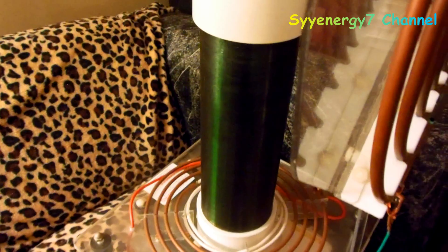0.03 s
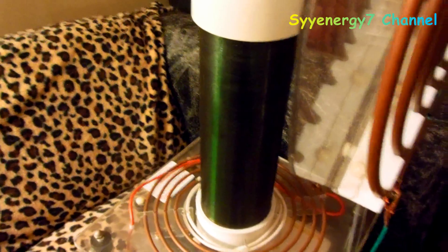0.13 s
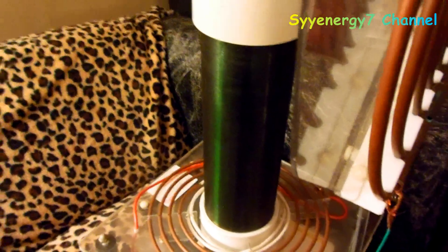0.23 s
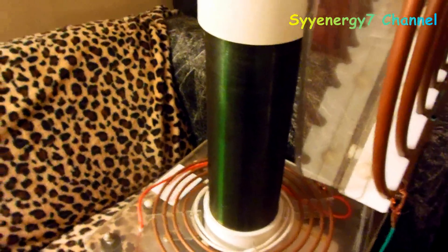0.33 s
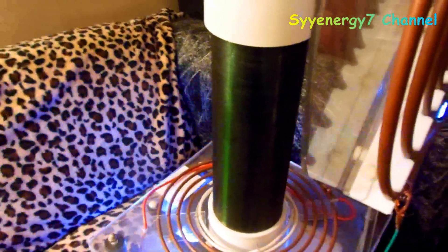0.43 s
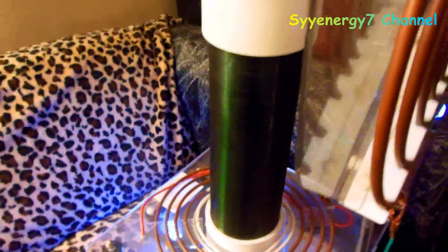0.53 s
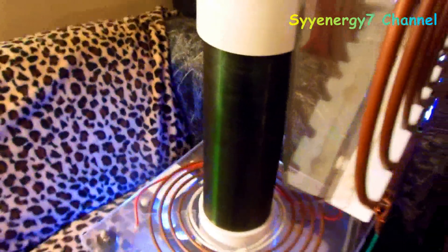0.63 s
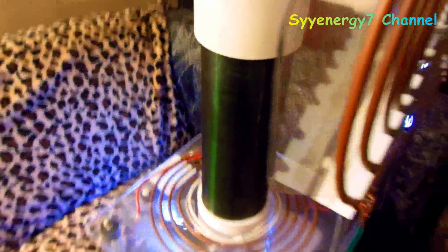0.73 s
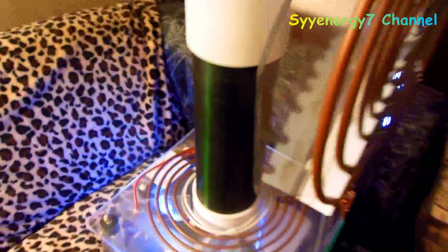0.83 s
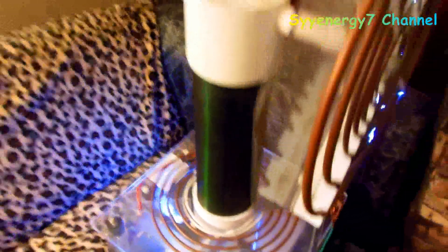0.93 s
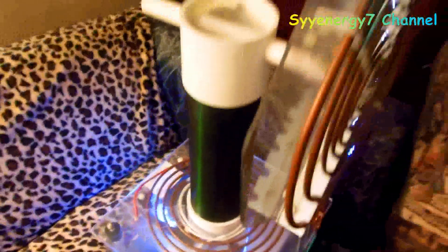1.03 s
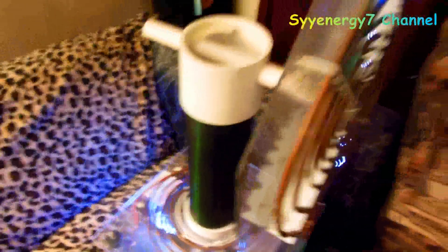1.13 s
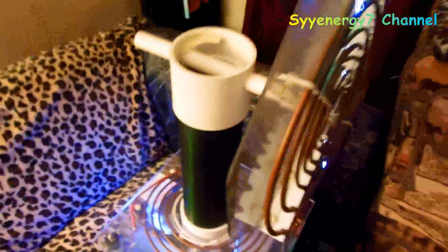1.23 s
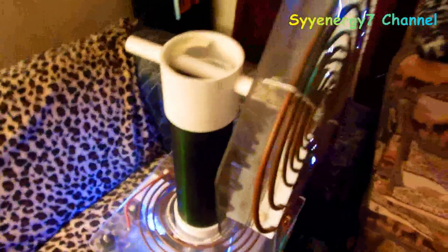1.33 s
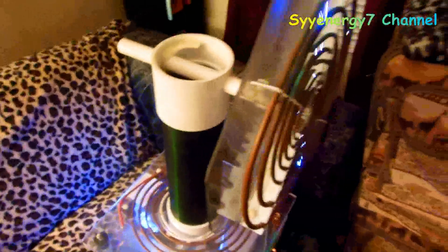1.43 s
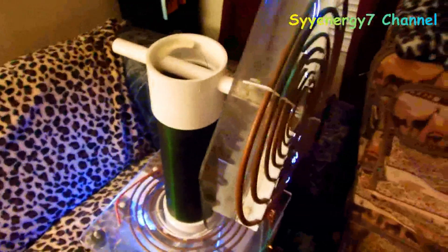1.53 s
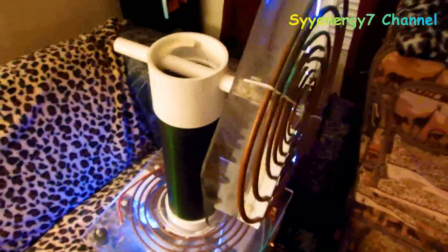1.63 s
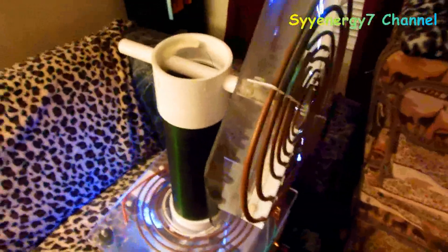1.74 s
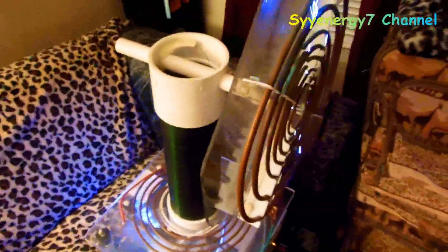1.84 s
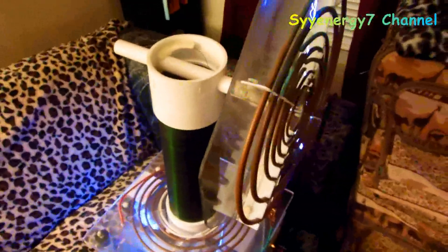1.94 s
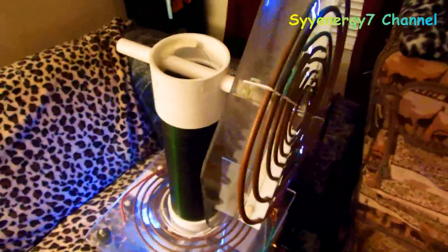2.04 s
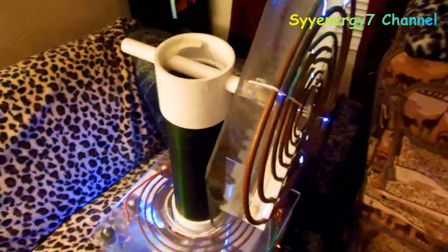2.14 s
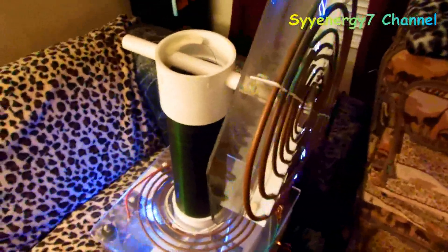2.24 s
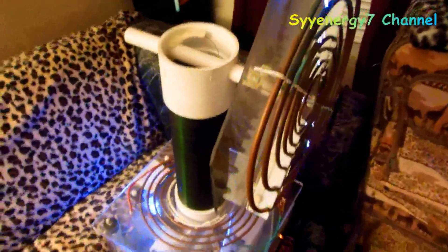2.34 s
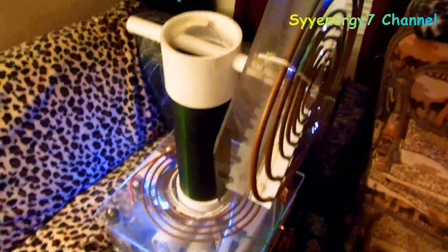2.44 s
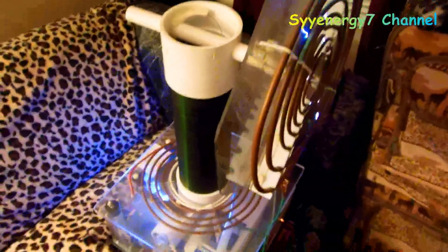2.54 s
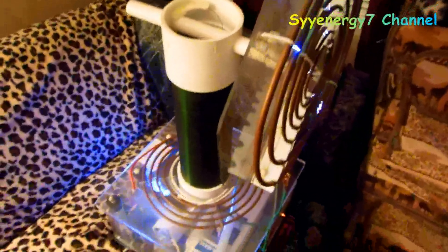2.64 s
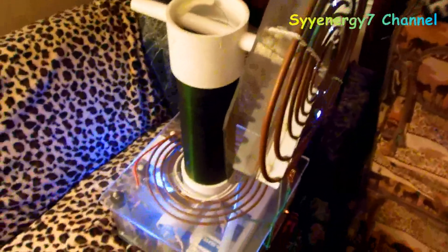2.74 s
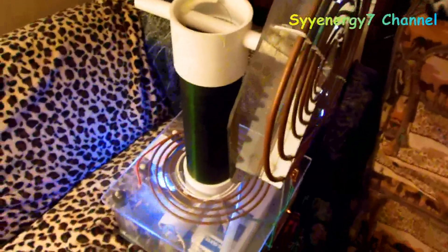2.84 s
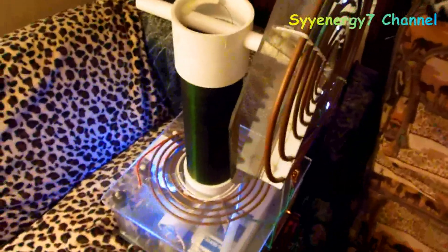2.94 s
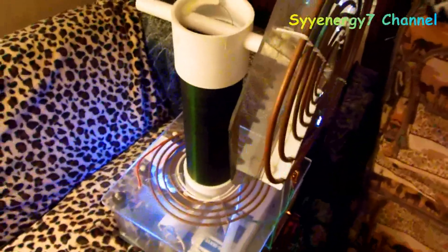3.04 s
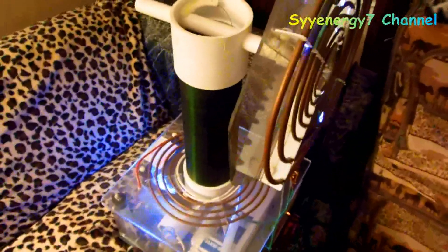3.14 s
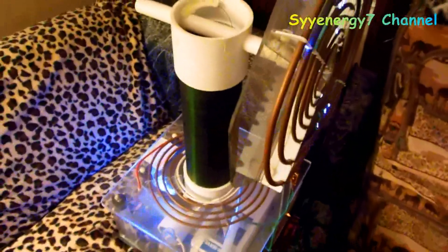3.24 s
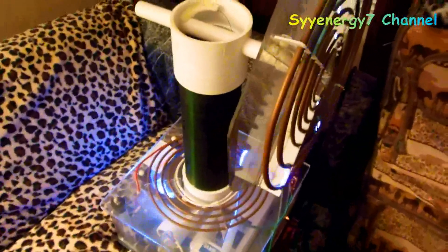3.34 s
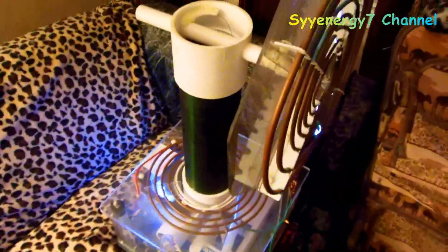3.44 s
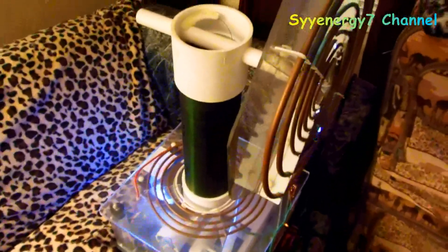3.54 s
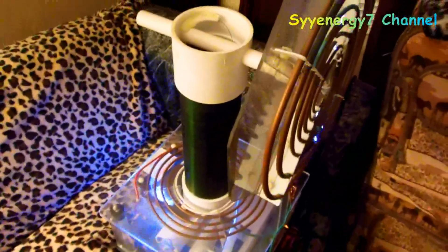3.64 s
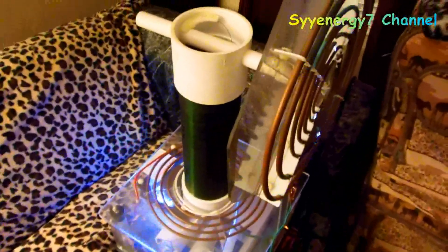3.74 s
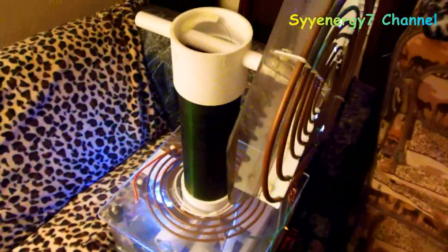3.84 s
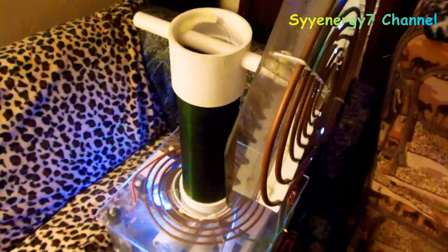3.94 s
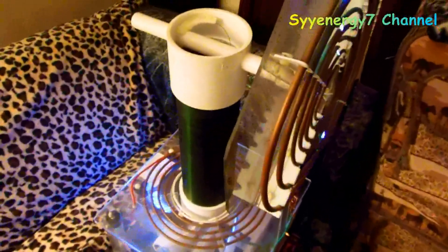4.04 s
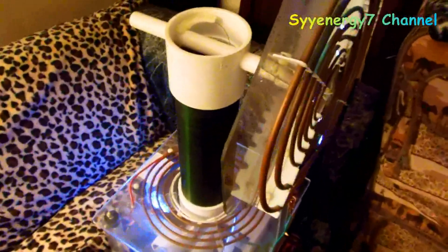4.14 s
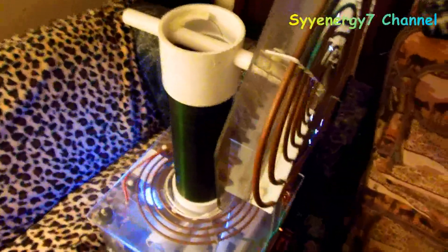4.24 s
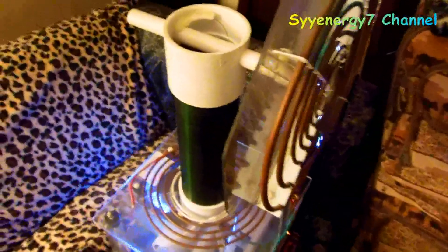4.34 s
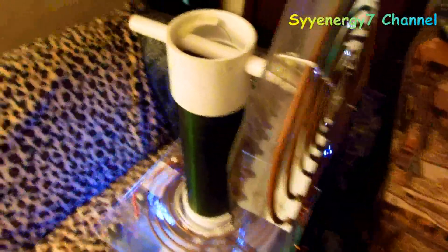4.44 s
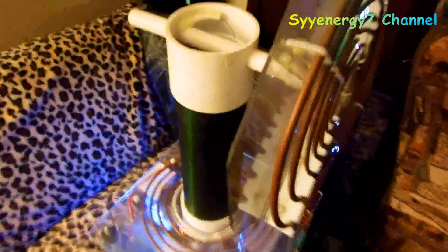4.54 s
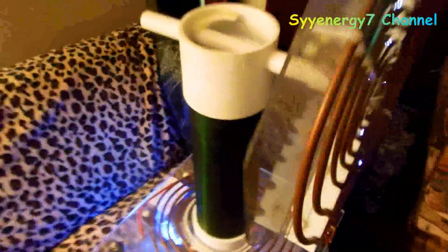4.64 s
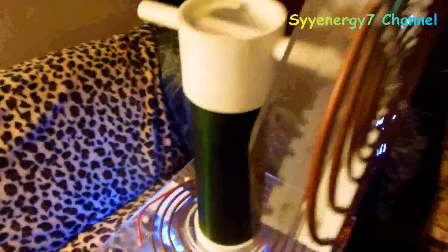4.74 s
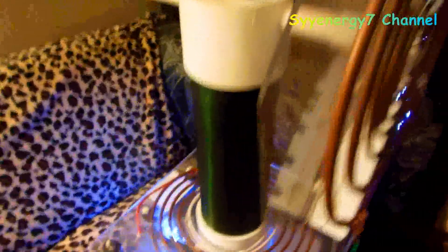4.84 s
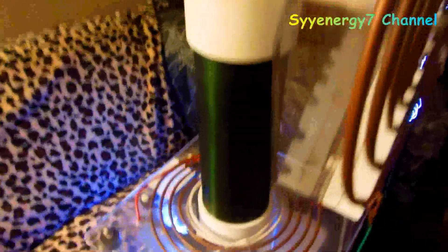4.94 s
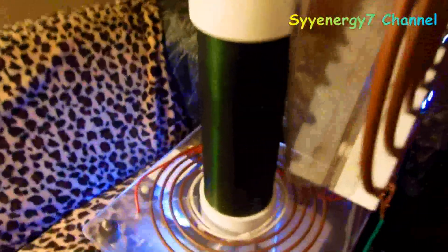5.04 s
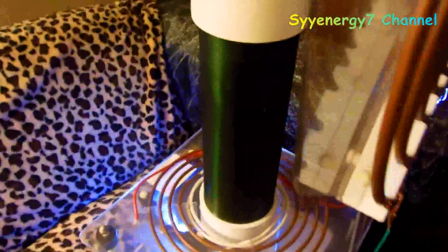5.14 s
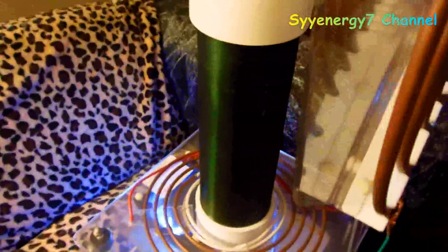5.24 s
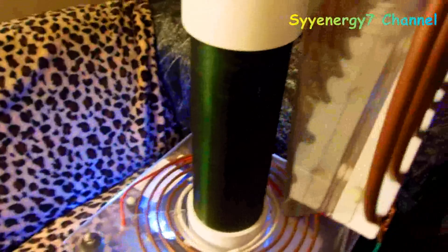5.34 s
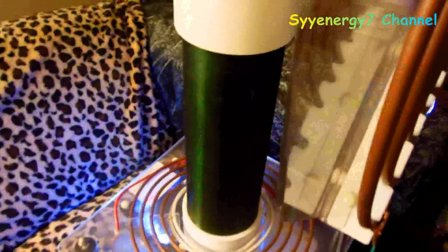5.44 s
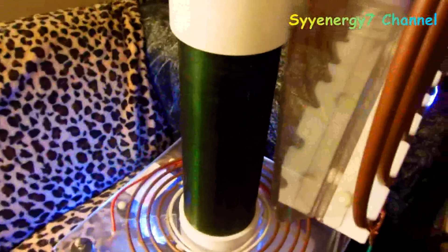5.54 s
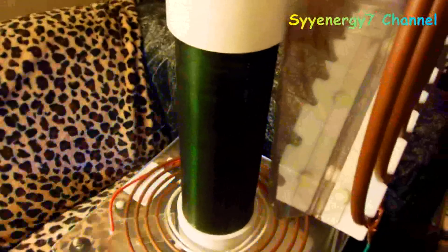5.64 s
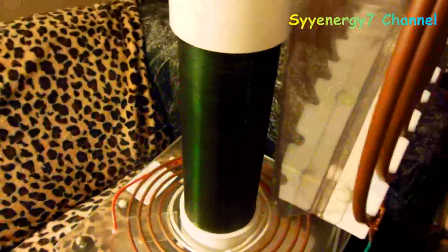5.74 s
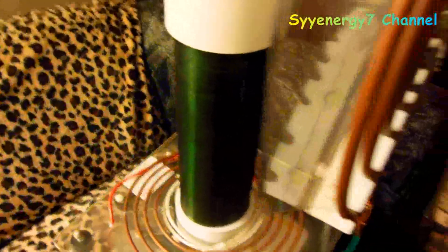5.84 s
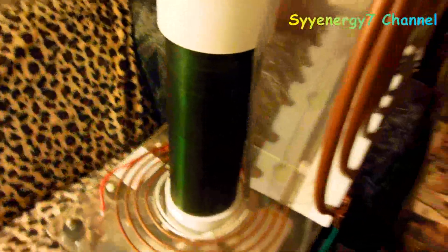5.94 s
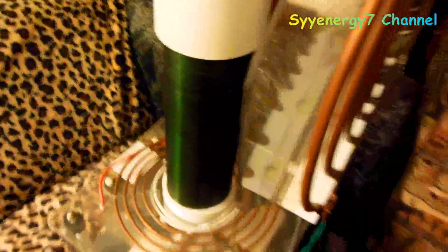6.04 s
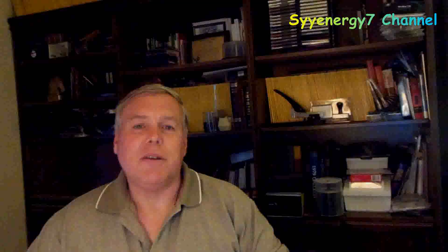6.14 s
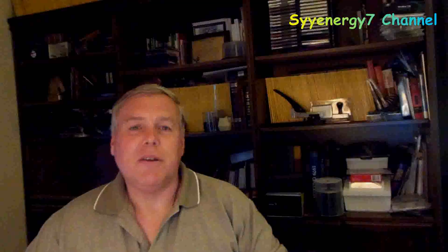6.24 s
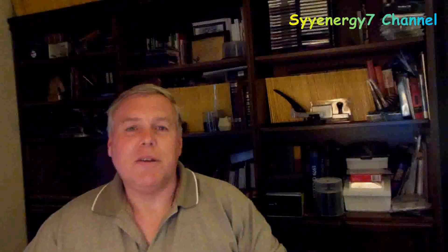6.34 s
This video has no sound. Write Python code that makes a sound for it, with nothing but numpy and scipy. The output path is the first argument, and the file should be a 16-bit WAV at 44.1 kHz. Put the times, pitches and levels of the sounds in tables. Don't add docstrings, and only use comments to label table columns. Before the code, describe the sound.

From 0 to 0.5 seconds, a quiet room: low mains hum, faint high whine, a small rustle at the start and light ticks and a bump near 0.4. At 0.49 a switch clacks and a spark-gap coil bursts on, hugely loud, clipping the close camera microphone; irregular heavy thumps and distorted crackle last until about 1.2 as the level falls sharply. Then a steady, harsh, bright electric buzz continues, made of slightly uneven cracks several times per half mains cycle, about 120 groups a second, with short room reverberation and occasional small pops. From about 4.6 low jolts grow stronger; near 4.8 to 4.95 the tone becomes a bit duller and more ringing. At 5.74 it stops abruptly, almost silent. From 5.85 soft low bumps and faint room noise rise. Around 6.2 the scene cuts with a small thump to a hissier quiet room until the end.

```python
import sys
import numpy as np
from scipy import signal
from scipy.fft import rfft, irfft
from scipy.io import wavfile
from scipy.ndimage import uniform_filter1d, minimum_filter1d

SR = 44100
rng = np.random.default_rng(int(sys.argv[2]) if len(sys.argv) > 2 else 0)


def master_out(mix):
    frames = np.transpose(np.atleast_2d(mix))
    ceiling = np.clip(frames, -1, 1)
    pcm = np.round(ceiling * 32767).astype(np.int16)
    wavfile.write(sys.argv[1], SR, pcm)


def nominal_scale(level):
    x = np.asarray(level, float) / 20
    return 10 ** x


N = 281710
TIME = np.arange(N) / SR
MAINS_HZ = 60.002
OFF_S, CUT_S = 5.742, 6.179

# (t/s, level/dB, left minus right/dB, room share/dB)
SPARK_LEVELS = [(0.4935, -16, -2, 7.5), (0.51, 2, 0.5, -8.5), (0.67, -10.5, 0.5, -4), (1.44, -30, 1, -2.5),
                (2.04, -26.5, 0, -4), (2.54, -29, 1.5, -4), (2.82, -27.5, 1.5, -4), (4.13, -27.5, 0.5, -4),
                (4.31, -24.5, 0, -5), (4.41, -27, 1.5, -5), (4.66, -26.5, 0, -5), (4.78, -28.5, 1, -4),
                (5.3, -31.5, 0.5, -5), (5.73, -28, 1.5, -5.5), (5.74, -31.5, 0.5, -10.5)]


def firings():
    half = np.arange(int(N / SR * 2 * MAINS_HZ))
    odd = (half % 2)[:, None]
    u = rng.random((len(half), 3, 3))
    spread_s = np.where(odd, [.0022, .0014, .0014], [.0013, .0018, .0014])
    wait_s = np.cumsum(u[:, :, 0] * spread_s + [0, .0011, .0010], axis=1)
    first_s = np.where(odd, .0004, .0008)
    s = (first_s + half[:, None] / (2 * MAINS_HZ)) + wait_s
    size = nominal_scale(1.5 - 4.8 * u[:, :, 1] ** 4 + [0, -1.5, -3] - 2.6 * odd)
    happens = u[:, :, 2] < [1, .55, .14]
    fired = happens & (s > SPARK_LEVELS[0][0]) & (s < OFF_S)
    return s[fired], size[fired]


def sparks(s, size):
    # (f/Hz, level per Hz/dB)
    crack_colour = [(100, -40), (200, -27), (500, -25), (1000, -23), (2100, -18.5), (3000, -9),
                    (3500, -6.5), (4500, -4), (6200, -1), (8000, 1.5), (12000, 4), (14300, 2.5)]
    # (f/Hz, width/Hz, level/dB)
    panel_rings = [(273, 23, 9.5), (390, 20, -6.5), (473, 8.3, -6.5), (658, 8, -1), (1077, 25, -5.5),
                   (1369, 45, 2.5), (1656, 190, -1.5)]
    # (t/s, level/dB)
    overload = [
        (.49, 11),
        (.75, 17),
        (1.0, 13),
        (1.15, 8.5),
    ]
    # (t/s, share of shade 0-1)
    shade_course = [
        (4.75, 0),
        (4.95, 0.87),
        (5.75, 0.79),
    ]
    # (f/Hz, width/Hz, gain)
    shade_bands = [
        (4450, 880, -0.61),
        (2900, 2000, 0.47),
    ]

    echo_ms, strength, late_us = view(s)
    gap = rng.integers(0, 4, len(s))
    echo_ms = echo_ms + .006 * (gap - 1.5)
    strength = np.minimum(1.7 * strength, .95)
    paths = [(0, 1),
             (.45 * echo_ms, 0.54 * strength),
             (echo_ms, -strength),
             (1.9 * echo_ms, .25)]
    near = 0
    for lag_ms, gain in paths:
        wander = rng.standard_normal((len(s), 4)).T
        left_late_s = late_us * 1e-6 * np.array([[1], [0]])
        lag_s = lag_ms / 1000 + left_late_s + 9e-6 * wander[:2]
        near = near + clicks(s + lag_s, size * gain * (1 + .2 * wander[2:]))

    both = np.ones((2, 1))
    wet = 0
    for k in range(4):
        one_gap = clicks(both * s, both * size * (gap == k))
        wet = wet + signal.fftconvolve(one_gap, room_tail(), axes=1)[:, :N]
    at, heard_db, pan_db, room_db = np.transpose(SPARK_LEVELS)
    mix = level(near, 0) + nominal_scale(np.interp(TIME, at, room_db)) * level(wet, 0)

    ring = 0
    for hz, width, db in panel_rings:
        ring = ring + nominal_scale(db) * signal.lfilter(*signal.iirpeak(hz, hz / width, SR), mix)
    sound = level(colour(mix + nominal_scale(7.5) * ring, crack_colour), -1.68)

    shade = np.interp(TIME, *np.transpose(shade_course))
    change = 0
    for hz, width, gain in shade_bands:
        change = change + gain * signal.lfilter(*signal.iirpeak(hz, hz / width, SR), sound)
    sound = sound + shade * change

    db = np.interp(TIME, at, heard_db) + np.interp(TIME, *np.transpose(overload))
    balance_db = np.interp(TIME, at, pan_db) * np.array([[.5], [-.5]])
    return sound * nominal_scale(db + balance_db)


def view(s):
    # (t/s, base-plate echo/ms, echo strength, left microphone late/us)
    stands = [(.5, .58, .8, 45), (1.05, 0.55, 0.76, 26), (1.25, 0.59, 0.99, 29), (1.55, 0.56, 0.48, 17.6),
              (4.6, .545, 0.35, 22.7), (5.75, 0.53, 0.33, 56)]
    at, *cols = np.transpose(stands)
    knots = np.arange(50)
    sway_s, sway_sizes = .15, np.array([[0.021], [0.09], [3.7]])
    sway = rng.standard_normal((len(knots), 3)).T * sway_sizes
    return [np.interp(s, at, c) + np.interp(s, knots * sway_s, w) for c, w in zip(cols, sway)]


def room_tail():
    age = TIME[:SR // 3]
    noise = rng.standard_normal((3, len(age)))
    low = signal.lfilter(*signal.butter(2, 4500, fs=SR), noise)
    treble = (noise[:2] - low[:2]) * (nominal_scale(-60 * age / .12) + .25 * nominal_scale(-60 * age / .3))
    bass = (1.3 * low[:2] + 1.87 * low[2]) * nominal_scale(-60 * age / 0.16)
    return (treble + bass) * (1 - np.exp(-age / 0.0057))


def jolts(s, size):
    at, step = arcs()
    heard_db = np.minimum(np.interp(s, *np.transpose(SPARK_LEVELS)[:2]), -18)
    dip = -size * np.minimum(rng.exponential(1, len(s)), 2) * nominal_scale(heard_db - 18.5)
    kicks = clicks(np.array([at, at]), step) + clicks(np.array([s, s]), dip * [[1], [.6]])
    swing = signal.lfilter(*signal.butter(1, 4500, fs=SR), bias_swing(kicks))
    return swing * (TIME < CUT_S)


def arcs():
    # (t/s, left step/%, right step/%, share
    strong_arcs = [(.52, -20.5, 58, 1.3), (0.539, -16.5, -26, 0.096), (0.6013, -118, -120, 0.48),
                   (.635, -45, -6, -0.53), (0.6619, -62.5, -18, -0.18), (0.6784, -57, -29.5, -0.12),
                   (.6998, -40.5, -26, -0.31), (.721, -44.5, -23, 0.17), (0.7347, -94, -62, .35),
                   (0.768, -38.5, -67.5, 0.061), (0.786, 45.5, 28.5, 1.4), (.8025, -88, -109, .25),
                   (0.8182, -25, -37.5, 0.76), (.828, -100, -87, 0.73), (0.8446, -52.5, -20, -1.1),
                   (.87, -28.5, -133, 0.57), (0.886, 21, 40, 1.1), (0.9023, -99, -58, 0.058),
                   (0.9104, 44, -78, -0.32), (.92, -117, -70.5, 1.2), (.944, -89, -6, -0.22),
                   (0.9524, -100, -124, 0.21), (0.9627, 118, 47, 1.2), (0.977, 88, 9.5, -1.1),
                   (1.0045, -96, -27, 0.29), (1.0525, -78, -15, -0.12), (1.1027, -71, -9, 0.11),
                   (1.118, -29, -4, 0.58), (1.135, -28, -15, 0.51), (1.185, -17.5, -2, 0),
                   (4.6358, -31, -11, -0.16), (4.668, -21, -1, 0), (4.684, -12, -7, -0.26),
             (4.701, -25, -3.5, -0.19), (4.7686, -24, 0, 0.3), (4.8184, -22, -10, -0.096),
             (4.8683, -14, 2, 0.18), (4.8858, 13, 4, -0.076), (4.9007, -47, -21, 0.25),
             (4.9512, -28, -7.5, -0.35), (4.984, -17, -12, 0.46), (5.001, -17, 6, -0.23),
             (5.0184, -22, -5, -0.16), (5.0352, -14.5, -4.5, -1.1), (5.069, -17, 5, 1.26),
             (5.1421, -33, -9, 0.29), (5.1672, -18, -11, 0), (5.2171, -13, -8, -0.15),
             (5.2754, -32, -8, -0.053), (5.3851, -18, -27, .8), (5.434, -25, 11, -0.36),
             (5.4934, -21, -10, .9), (5.509, 26, 5, 1), (5.5515, -24, -36, -.4), (5.5757, 36, 16, .2),
             (5.6004, -36, -21, 0.54), (5.6175, -23, -1, 0.19), (5.6924, 29, -2, 1),
             (5.7167, -18.5, -9, .8), (5.7364, -22, -7, 0)]
    # (t/s, left step/%)
    far = [(1.202, -9), (1.302, -4), (1.5367, -4.5), (2.0854, -6.5), (2.218, -5.5), (2.2692, -12.5),
           (2.352, -9.5), (2.653, -3.5), (3.2014, -3), (3.2188, -2.5), (3.2358, -2.5), (3.334, -2.5),
           (3.427, -4.5), (3.484, -9), (3.585, -3.5), (3.7177, -3), (4.0494, -2), (4.118, -14),
           (4.1674, -2), (4.269, -6), (4.367, -6.5), (4.419, -10.5), (4.487, -7), (4.502, -7),
           (4.518, -6.5), (4.545, -5), (4.566, -10)]
    # (t/s, level/dB of full scale)
    field = [(.49, -16), (.98, -10), (1.03, -20), (1.25, -36.5), (1.5, -47), (1.6, -51), (4.2, -53),
             (4.6, -30.5), (5.0, -30), (5.75, -17)]
    give_back_s = .0078

    far_both = [(s, step, 0.35 * step, 0) for s, step in far]
    at, left, right, back = np.transpose(strong_arcs + far_both)
    strong = np.array([left, right]) / 100

    half = np.arange(int(OFF_S * 2 * MAINS_HZ))
    u = rng.standard_normal((len(half), 3)).T
    when = (half + .22 + .08 * u[2]) / (2 * MAINS_HZ)
    alike, right_gain = 0.95, 0.88
    right_u = right_gain * (alike * u[0] + np.sqrt(1 - alike ** 2) * u[1])
    plain = np.abs(u[2]) ** .6 * np.array([u[0], right_u])
    plain = plain * nominal_scale(np.interp(when, *np.transpose(field), left=-120))
    distance_s = np.abs(when[:, None] - at - give_back_s / 2).min(axis=1)
    plain = plain * (distance_s > give_back_s)
    return np.hstack([at, at + give_back_s, when]), np.hstack([strong, -back * strong, plain])


def gain_climb():
    k = np.arange(11)
    blocks = 5.8499 + 512 / 48000 * k
    climb = 0.27 + 0.78 * np.exp(-.5 * ((k - 2) / 1.5) ** 2)
    steps = clicks(np.array([blocks, blocks]), climb * [[1.1], [.8]] / 100)
    return bias_swing(steps) * (TIME < CUT_S)


def bias_swing(kicks):
    w, q = 2 * np.pi * 6, .9
    return signal.lfilter(*signal.bilinear([1, 0], [1, w / q, w * w], SR), kicks * SR)


def rustles():
    # (t/s, peak/dB, f/Hz, length/ms)
    events = [
        (0.061, -48.5, 3170, 17),
        (.27, -63, 5000, 12),
        (.376, -55, 1780, 4),
        (.406, -45.5, 550, 8.9),
        (.412, -54, 2596, 6),
        (0.4943, -12.5, 1290, 7.6),
        (6.152, -63, 8820, 8),
    ]
    out = 0
    for s, db, hz, ms in events:
        band = signal.lfilter(*signal.iirpeak(hz, 2.5, SR), rng.standard_normal(N))
        out = out + level(band, db) * (TIME > s) * np.exp(-np.abs(TIME - s) * 1000 / ms)
    return out


def hums():
    # (f/Hz, level/dB rms)
    idle = [
        (118.4, -54),
        (242, -68.5),
        (12300, -75),
        (13200, -74.5),
    ]
    # (f/Hz, level/dB rms)
    loaded = [(118.4, -58.5), (236, -67.5), (176, -71.5), (294, -64), (415, -62.5), (535, -66.5)]
    before = tones(idle, 1.2) * (TIME > .058) * (TIME < .5)
    return before + tones(loaded, 1.7) * (TIME > .5) * (TIME < OFF_S)


def bench_room():
    # (t/s, level/dB)
    spans = [
        [(.058, -62), (.06, -51.5), (.1, -55), (.3, -54.5), (.48, -56), (.493, -52)],
        [(5.8, -80), (5.89, -69), (5.96, -59), (6.0, -57), (6.1, -57), (6.179, -60)],
    ]
    # (f/Hz, level per Hz/dB)
    shapes = [
        [(25, -20), (54, -6), (120, -16.5), (250, -18), (500, -24), (1500, -29.5), (5000, -35.5), (14300, -42)],
        [(25, 4.5), (50, -14.5), (120, -22), (300, -32), (430, -21.5), (550, -34.5), (2000, -36), (4800, -40.5),
         (6500, -52.5), (14300, -56.5)],
    ]
    return sum(air(shape, curve(span), 0.66) for span, shape in zip(spans, shapes))


def second_room():
    # (t/s, level/dB)
    hiss = [(6.191, -60), (6.211, -57.5), (6.213, -46.5), (6.25, -46.5), (6.319, -44.5), (6.388, -47)]
    # (f/Hz, level per Hz/dB)
    hiss_colour = [(15, -37), (25, 1.5), (204, -9), (396, -13.5), (622, -14), (977, -14.5), (1150, -16),
                   (1460, -17.5), (14300, -22.5)]
    # (t/s, left/%, right/%, rise/ms, decay/ms)
    offsets = [
        (6.179, .4, -0.19, .1, 300),
        (6.192, -3, -0.56, 2, 83),
        (6.2128, 4, 0.82, .2, 62),
        (6.2146, -2.5, -2.3, .1, 6.5),
    ]
    out = 0
    for s, left, right, rise_ms, decay_ms in offsets:
        age_ms = np.maximum(TIME - s, 0) * 1000
        shape = (1 - np.exp(-age_ms / rise_ms)) * np.exp(-age_ms / decay_ms)
        out = out + np.array([[left], [right]]) / 100 * shape
    return out + air(hiss_colour, curve(hiss), .5)


def tones(lines, flicker_db):
    out = 0
    for hz, db in lines:
        waver = np.interp(TIME, np.arange(80) * .08, rng.standard_normal(80))
        out = out + np.sqrt(2) * nominal_scale(db + flicker_db * waver) * np.sin(2 * np.pi * hz * TIME)
    return out


def air(points, db, alike):
    noise = rng.standard_normal((3, N))
    mixed = alike * noise[2] + np.sqrt(1 - min(alike, 1) ** 2) * noise[:2]
    x = colour(mixed, points)
    upper = signal.sosfilt(signal.butter(2, 200, "high", fs=SR, output="sos"), x)
    return x * nominal_scale(db) / upper.std()


def level(x, db):
    return x * nominal_scale(db) / np.sqrt(np.mean(x ** 2))


def curve(table, column=1):
    rows = np.array(table, float)
    return np.interp(TIME, rows[:, 0], rows[:, column], left=-120, right=-120)


def colour(x, points):
    hz, db = np.transpose(points)
    grid = np.fft.rfftfreq(4096, 1 / SR)
    shape_db = np.interp(np.log(grid + 1), np.log(hz), np.maximum(db, -70))
    cep = irfft(np.log(nominal_scale(shape_db)))
    cep[1:2048] *= 2
    cep[2049:] = 0
    response = irfft(np.exp(rfft(cep)))
    return signal.fftconvolve(x, response[None], axes=1)[:, :N]


def clicks(s, size):
    out = np.zeros((2, N + 16))
    at = np.clip(s * SR, 0, N - 1)
    tap = np.arange(-7, 9)
    for ch in range(2):
        off = tap - (at[ch] % 1)[:, None]
        shape = np.sinc(off) * np.cos(np.pi * off / 16) ** 2
        np.add.at(out[ch], at[ch].astype(int)[:, None] + tap + 7, size[ch][:, None] * shape)
    return out[:, 7:N + 7]


def scene():
    s, size = firings()
    coil = sparks(s, size) + jolts(s, size) + gain_climb()
    return coil + rustles() + hums() + bench_room() + second_room()


def starve(x):
    hz, _, z = signal.stft(x, SR, nperseg=2048)
    f = hz[:, None]
    power = uniform_filter1d(np.mean(np.abs(z) ** 2, axis=0), size=2, axis=1)
    narrow = uniform_filter1d(power, size=5, axis=0)
    wide = uniform_filter1d(power, size=26, axis=0)
    total = power.sum(axis=0) + 1e-12
    bass = uniform_filter1d(power[hz < 300].sum(axis=0) / total, size=3)
    bass = np.maximum(bass, np.minimum(4 * total / total.max(), 1))
    steady = minimum_filter1d(total, size=7) > .003 * total
    reach = (f > 3100 - 1200 * bass) & (f < 4100 + 1500 * bass)
    poorest_db = 5.5 * np.exp(-((f - 3540) / 120) ** 2) * (1 - bass)
    luck = uniform_filter1d(rng.standard_normal(power.shape), size=8, axis=0)
    luck_db = 13 * uniform_filter1d(luck, size=2)
    limit_db = -8.0 + 2.6 * bass + poorest_db + luck_db
    weak = (narrow < wide * nominal_scale(limit_db) ** 2) & reach & steady
    kept = minimum_filter1d(np.where(weak, .02, 1), size=5, axis=0)
    return signal.istft(z * kept, SR, nperseg=2048)[1][:, :N]


def band_limit(x):
    return signal.sosfilt(signal.butter(12, 15540, fs=SR, output="sos"), x)


def record(dry):
    # (f/Hz, level/dB)
    leak_colour = [(14300, 0), (14650, -6), (15100, -24), (15800, -55)]
    held = np.clip(dry, -1.0, 1.0)
    cut = signal.sosfiltfilt(signal.ellip(10, .15, 35, 14300, fs=SR, output="sos"), held)
    above = held - cut
    sharp = uniform_filter1d(above ** 2, size=90) > 2.7 * uniform_filter1d(above ** 2, size=1500)
    leak = nominal_scale(-9) * colour(above, leak_colour) * uniform_filter1d(1. * sharp, size=120)
    return band_limit(starve(cut) + leak)


dry = scene()
out = record(dry)
master_out(out)
```